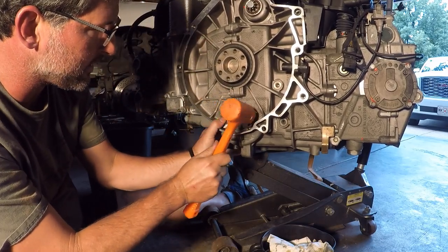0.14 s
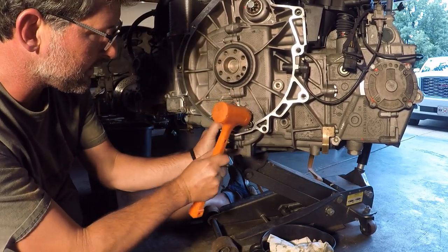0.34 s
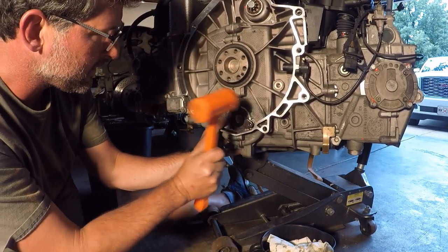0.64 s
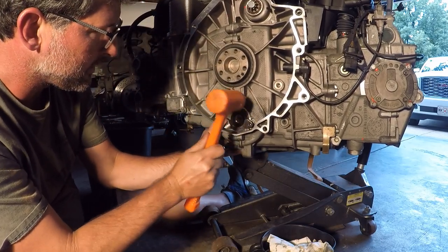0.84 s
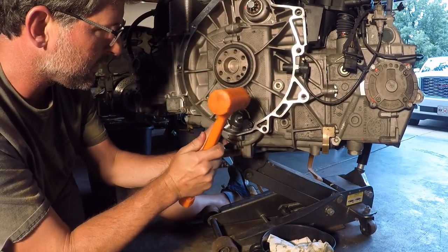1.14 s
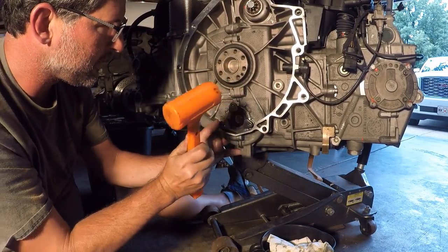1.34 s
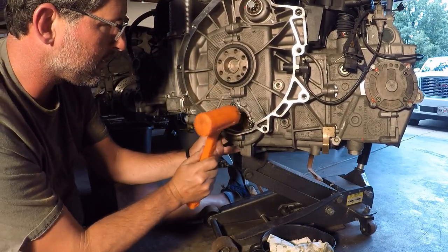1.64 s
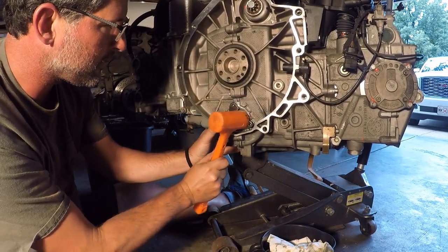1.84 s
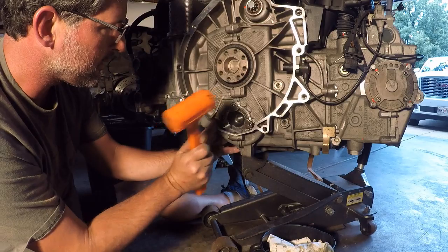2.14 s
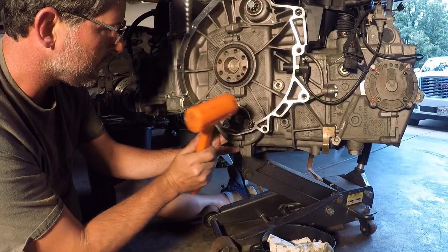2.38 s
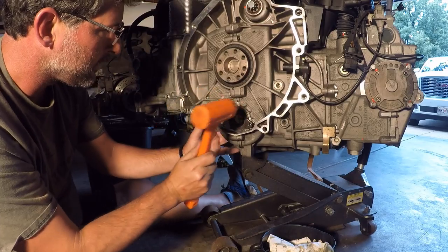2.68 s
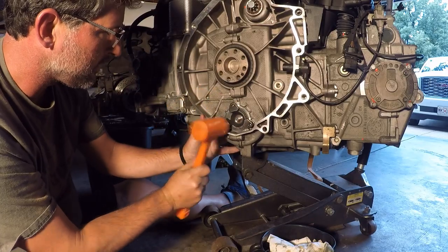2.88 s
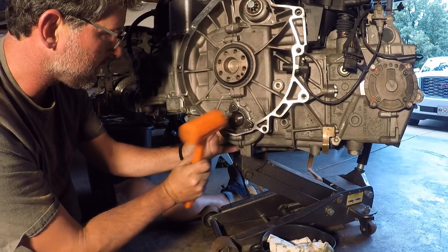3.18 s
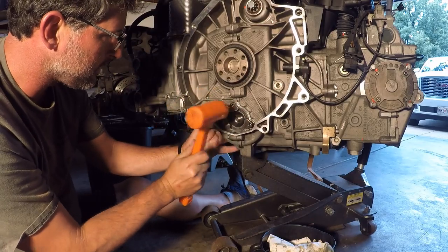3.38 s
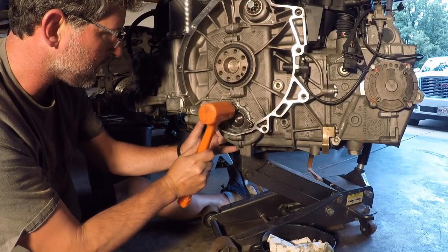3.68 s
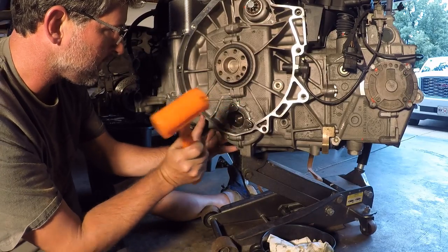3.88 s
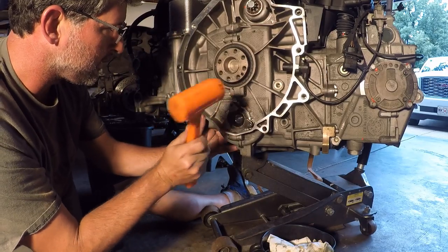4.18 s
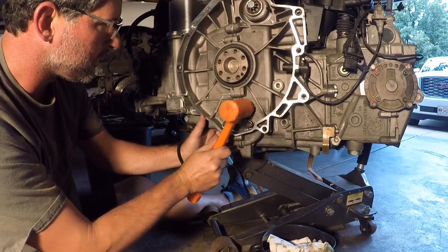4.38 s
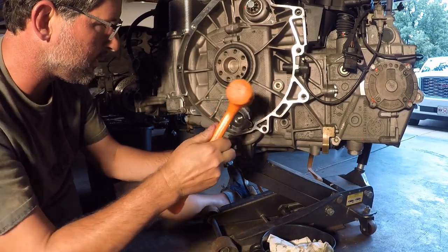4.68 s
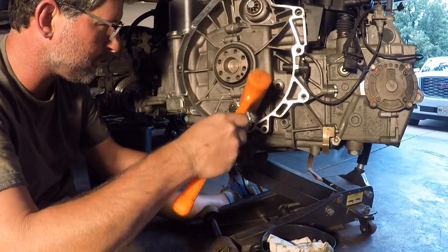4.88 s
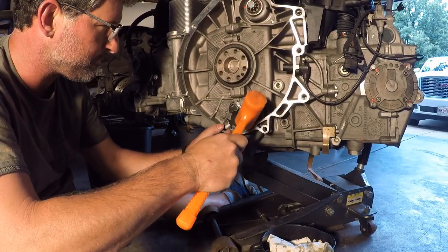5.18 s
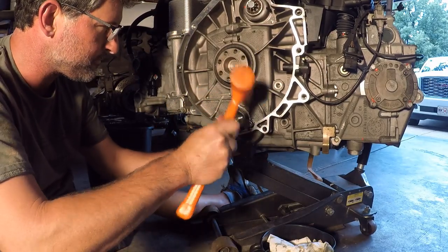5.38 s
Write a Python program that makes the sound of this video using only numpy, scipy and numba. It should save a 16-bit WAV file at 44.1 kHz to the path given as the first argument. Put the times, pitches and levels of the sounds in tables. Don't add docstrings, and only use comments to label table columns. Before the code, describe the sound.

In an open garage, a plastic mallet filled with loose shot taps a metal cover into an engine case. Fourteen short, hard clacks come roughly three a second, each with a brief metallic ring, a pellet rattle and a quick garage echo. Soft first, harder in the middle, with a pause near the end. A camera an arm's length away hears it over faint traffic and hiss.

```python
import sys
import numpy as np
from scipy import signal
from scipy.fft import rfft, irfft
from scipy.io import wavfile
from scipy.ndimage import uniform_filter1d
from numba import njit

SR = 44100
rng = np.random.default_rng(int(sys.argv[2]) if len(sys.argv) > 2 else 0)


def master_out(mix):
    frames = np.transpose(np.atleast_2d(mix))
    ceiling = np.clip(frames, -1, 1)
    pcm = np.round(ceiling * 32767).astype(np.int16)
    wavfile.write(sys.argv[1], SR, pcm)


def field_ratio(decibels):
    return 10 ** (np.asarray(decibels, dtype=float) / 20)


N = 243758

# start_s, spot, force_db, thud_db and case_db (against the cover), away_db (extra sent to the walls)
BLOWS = [(0.0315, "left", -22, -1, -0.5, -0.5), (0.3499, "upper left", -21, -1, 0.1, 0.2),
         (0.6908, "low", -28, 0.5, -7, 0.4), (1.489, "low", -25, 0, -6, -1.5),
         (1.824, "left", -17, -9.5, -4.5, 0.6), (2.2061, "upper right", -15.5, -7.5, -10, -0.3),
         (2.5306, "top", -13.5, -17, -12, 1.1), (2.904, "low", -22, -4, 1.8, 0),
         (3.2261, "right", -14.5, -17, -14.5, 0.7), (3.574, "right", -14.5, -12.5, -12, 0.2),
         (3.9524, "top", -17, -5.5, 0.5, 3.5), (4.3098, "top", -18.5, -1, -4.5, 1.3),
         (5.078, "low", -40, 8, 1.5, -2.5), (5.4255, "upper left", -21, -1, 1, -0.2)]
# pitch_hz, left_minus_right_db
SIDE_BALANCE = [(60, -6), (110, 1.5), (200, -0.5), (380, 3.5), (700, 0.5), (1290, -1), (2380, 3),
                (4400, -1), (8120, 4), (15000, -7)]
LEFT_RIGHT = np.array([[1], [-1]])


def on_log(table, hz, column=1):
    rows = np.array(table, float)
    return np.interp(np.log(np.maximum(hz, 1)), np.log(rows[:, 0]), rows[:, column])


def octaves_from(hz, centre):
    return abs(np.log2(np.maximum(hz, 1) / centre))


def bump(hz, centre, width):
    return np.exp(-(np.log(np.maximum(hz, 1) / centre) / width) ** 2)


def add(out, sound, start_s):
    i = int(start_s * SR)
    out[:, i:i + sound.shape[1]] += sound[:, :N - i]


def contact(width_ms, chatter_ms, count):
    knocks = np.zeros(300)
    chance = rng.random((count, 2))
    delay_ms = np.clip(chatter_ms, 0, 6) * chance[:, 0]
    knocks[(delay_ms * SR / 1000).astype(int)] = .8 * chance[:, 1] - .3
    knocks[0] = 1
    return -np.convolve(knocks, np.hanning(int(width_ms * SR / 1000) + 3))


def ring(modes, push, db, skew):
    spread_db, detune = 2.0, .012
    hz, gain_db, t60_s = np.array(modes, float).T[:, :, None]
    t = np.arange(2600) / SR
    lag = -1.6 * np.argsort(np.argsort(hz, axis=0), axis=0)
    chance = rng.standard_normal((len(modes), 4)).T[:, :, None]
    shape = field_ratio(-60 * t / t60_s) * (1 - 0.8 * np.exp(-t / 0.0005))
    ports = []
    for side in (1, -1):
        level = field_ratio(gain_db + spread_db * (chance[0] + skew * side * chance[1]))
        phase = 2 * np.pi * hz * (1 + detune * chance[2]) * t + lag + skew * side * chance[3]
        ports.append(np.sum(level * shape * np.sin(phase), axis=0))
    sound = signal.fftconvolve(np.array(ports), push[None])[:, :len(t)]
    return sound * field_ratio(db) / sound.mean(axis=0)[:400].std()


def blend(reach_db, notes_hz, lift_db):
    # low_hz, high_hz
    part_hz = [(150, 600), (600, 1500), (1500, 4200), (4200, 8000)]
    # pitch_hz, level_db
    far_treble = [(7400, 0.55), (8800, -21), (15000, -29.5)]
    # pitch_hz, lift_db, relative_width
    hollows = [(200, -4, 0.15), (375, 5, 0.13), (650, -4, 0.1), (800, 2, 0.06), (990, 4, 0.09),
               (2800, 2, 0.15)]
    hz = np.arange(2049) * SR / 4096
    colour = [(np.sqrt(lo * hi), db - 10 * np.log10(hi - lo)) for (lo, hi), db in zip(part_hz, reach_db)]
    colour_db = on_log(colour, hz) + on_log(far_treble, hz)
    colour_db += sum(lift_db * bump(hz, f, 0.45) for f in notes_hz)
    colour_db += sum(db * bump(hz, f, width) for f, db, width in hollows)
    fold = np.clip(2 - np.arange(4096) // 1024, 0, 2) - (np.arange(4096) == 0)
    causal = irfft(np.exp(rfft(irfft(np.log(field_ratio(colour_db))) * fold)))
    return causal[None] * np.ones((2, 1))


def blows():
    spots = {"left": (520, 764, 1690, 6300, -1.5), "upper left": (527, 770, 3450, 6200, -1.5),
             "low": (310, 960, 2350, 5900, -2), "right": (516, 1540, 2280, 6550, -1.5),
             "top": (280, 1170, 3200, 4550, -6), "upper right": (270, 1150, 1754, 4750, -6)}
    # pitch_hz, level_db, t60_s (time to fade by 60 dB)
    thud = [(213, 1, 0.056), (270, 20.5, 0.0086), (370, 1.5, 0.036), (536, -4, 0.17)]
    case = [(620, -6, 0.015), (770, 2, 0.024), (865, 3, 0.022), (1000, 3, 0.014), (1170, 1, 0.022),
            (1300, -6, 0.008)]
    cover = [(1687, 3.5, 0.008), (1970, 5.5, 0.0057), (2400, 0, 0.0074), (2780, 10, 0.0024),
             (3105, 0.5, 0.0087), (3525, 11.5, 0.0061), (4000, 7, 0.0029)]
    crack = [(4445, -4, 0.019), (5250, -42, .005), (5810, 4, 0.0066), (7000, 17, 0.0018),
             (6900, -14, 0.0076), (8800, -27, 0.0036), (9400, 9, 0.014), (11700, -22, .003),
             (13000, -23, .003), (14500, -26, .003)]
    trim_db = (0.83, 0.74, 0.73, 2.6)
    note_t60_s = (.035, .02, .008, .006)
    skew = (0.044, 0.64, 0.31, 0.59)
    reach_share = (0.12, 0.16, 0, 0)
    usual_reach_db, reach_per_db = np.array([-45.5, -42, -41, -45]), np.array([0.25, 0.95, 1.05, 0.42])
    usual_force_db, note_db = -17, 8
    crack_db, crack_per_db = -24.5, 0.52
    near, far = np.zeros((2, N)), np.zeros((2, N))
    for start_s, spot, force_db, thud_db, case_db, away_db in BLOWS:
        *notes_hz, case_pan_db = spots[spot]
        pan_db = (3.2, case_pan_db, 0.8, 2.2)
        extra_db = force_db - usual_force_db
        part_db = (force_db + thud_db, force_db + case_db, force_db, crack_db + crack_per_db * extra_db)
        hard = contact(.1, 2.2, count=4)
        pushes = (contact(0.25, 3.68, count=2), hard, hard, hard)
        for k, modes in enumerate((thud, case, cover, crack)):
            note = (notes_hz[k], note_db, note_t60_s[k])
            close = ring(modes + [note], pushes[k], part_db[k] + trim_db[k], skew[k])
            add(near, close * field_ratio(pan_db[k] * LEFT_RIGHT / 2), start_s - .0003)
        reach_db = usual_reach_db + reach_per_db * extra_db
        reach_db += np.array(reach_share) * (thud_db + 11, case_db + 3, 0, 0) + away_db
        add(far, blend(reach_db, notes_hz[:3], lift_db=-0.14) * field_ratio(88.0), start_s)
    return near, far


def shot():
    # pile_up_s, level_db, slide_ms
    slides = [(0.31, -38.5, 40), (0.648, -37.5, 38), (0.992, -43.5, 28), (1.172, -51.5, 34),
              (1.379, -47, 35), (1.773, -39.5, 40), (2.159, -37.5, 43), (2.483, -39.5, 49),
              (2.816, -44, 40), (3.18, -39, 36), (3.529, -38, 45), (3.906, -38, 58), (4.264, -36, 44),
              (4.825, -59, 59), (5.042, -41.5, 28), (5.382, -40, 21)]
    # pitch_hz, level_db (per Hz)
    shot_colour = [(1180, -14), (2000, -8), (2460, -3.5), (3520, -1), (4080, -2.5), (6090, 2),
                   (8480, -12.5), (9740, -14), (11000, -18), (13900, -14), (15600, -27), (16000, -54)]
    t, effort = np.arange(N) / SR, np.zeros(N)
    moves = []
    for pile_up_s, db, slide_ms in slides:
        fall_ms = 30.5 * field_ratio(-0.26 * (db + 39.5))
        moves.append((pile_up_s, db, slide_ms, 11.5, fall_ms))
    for start_s, _, _, thud_db, *_ in BLOWS:
        throw_db = -28 + 1.67 * min(thud_db, 0)
        moves.append((start_s + 0.0087, throw_db, 5.5, 6, 22))
    for peak_s, db, slide_ms, swell_db, fall_ms in moves:
        ms = (t - peak_s) * 1000
        shape_db = np.where(ms < 0, swell_db * ms / slide_ms, -20 * ms / fall_ms)
        effort += field_ratio(db + shape_db) * np.clip((ms + slide_ms) / 9 + .5, 0, 1)
    hz, spectrum = np.arange(N // 2 + 1) * SR / N, 0
    for centre in 1000 * 2 ** np.arange(0, 4.1, 1 / 3):
        knocks = rng.standard_normal((3, N)) * (rng.random(N) < .045)
        spectrum = spectrum + rfft(knocks) * np.clip(1 - 3 * octaves_from(hz, centre), 0, 1)
    clicks = irfft(spectrum * field_ratio(on_log(shot_colour, hz)), N)
    return effort * field_ratio(4.5) * (clicks[0] + .5 * clicks[1:]) / clicks.std()


def diffuse_bands(size):
    # pitch_hz, correlation
    likeness = [(60, 0.23), (130, 0.36), (290, 0.74), (640, -0.1), (1410, -0.28), (3100, 0.7), (6820, 0.05),
                (15000, -0.18)]
    hz = np.arange(size // 2 + 1) * SR / size
    like = np.clip(on_log(likeness, hz), -.95, .95)
    mid, side = rfft(rng.standard_normal((2, size)))
    pair = (np.sqrt(1 + like) * mid + np.sqrt(1 - like) * side * LEFT_RIGHT) / np.sqrt(2)
    for centre in 40 * 2 ** np.arange(0, 9.1, .5):
        yield centre, pair * np.clip(1 - 2 * octaves_from(hz, centre), 0, 1), hz


def garage(x, wet_db, build_ms, hold_s, early_db, early_t60):
    # pitch_hz, t60_s, level_db
    echo_colour = [(145, 0.47, 3), (406, 0.38, 4.5), (1010, 0.39, 7.5), (2900, 0.42, 0), (4760, 0.35, 1.5),
                   (7500, 0.34, 5), (8600, 0.36, 13.5), (13000, 0.34, 10.5), (16000, .2, -14)]
    t = np.arange(2 ** 15) / SR
    gather = 1 - np.exp(-(t * 1000 / build_ms) ** 2)
    fading_s = np.hypot(t, hold_s) - hold_s
    early = field_ratio(early_db - 60 * t / early_t60) * (t > .0015)
    echoes = 0
    for centre, band, hz in diffuse_bands(len(t)):
        lean_db = 0.46 * on_log(SIDE_BALANCE, centre) * LEFT_RIGHT
        late = gather * field_ratio(-60 * fading_s / on_log(echo_colour, centre))
        echoes = echoes + irfft(band) * field_ratio(on_log(echo_colour, centre, column=2) + lean_db) * (early + late)
    return field_ratio(wet_db) * signal.fftconvolve(x.mean(axis=0)[None], echoes)[:, :N]


def walk(rate):
    k = int(SR / rate)
    steps = np.repeat(rng.standard_normal(N // k + 1), k)
    return uniform_filter1d(uniform_filter1d(steps, k), k)[:N]


def outdoors():
    # pitch_hz, level_db (per Hz)
    noise_colour = [(140, 1), (250, 0.5), (345, -4.5), (420, -6.5), (620, -7.5), (1000, -9.5), (1550, -7),
                    (2400, -16.5), (4500, -21.5), (7000, -15), (8200, -22.5), (11500, -33), (14800, -39),
                    (16000, -54)]
    # pitch_hz, level_db
    hum_tones = [(356, -53), (271, -71)]
    swell, out = walk(1.0), 0
    for _, band, hz in diffuse_bands(2 * (N // 2 + 1)):
        lean_db = on_log(SIDE_BALANCE, hz) / 2 * LEFT_RIGHT
        noise = irfft(band * field_ratio(on_log(noise_colour, np.maximum(hz, 140)) + lean_db))[:, :N]
        out = out + noise * field_ratio(1.1 * swell + 0.43 * walk(3.9))
    t = np.arange(N) / SR
    hum = sum(field_ratio(db - 3.0 + 5.8 * walk(25)) * np.sin(2 * np.pi * f * t) for f, db in hum_tones)
    return out * field_ratio(-45.5) / out.mean(axis=0).std() + hum


def scene():
    near, far = blows()
    pellets = shot()
    echo = garage(far + field_ratio(-8) * pellets, wet_db=-37.5, build_ms=20.4, hold_s=0.041,
                  early_db=11.5, early_t60=0.062)
    return near + pellets + echo + outdoors()


@njit
def follow(x, attack, release):
    e, out = 0., np.empty(len(x))
    for i in range(len(x)):
        e += (x[i] - e) * (attack if x[i] > e else release)
        out[i] = e
    return out


def low_pass(x):
    return signal.sosfilt(signal.butter(12, 16640, fs=SR, output="sos"), x)


def record(dry):
    low_cut = signal.ellip(N=7, rp=.5, rs=50, Wn=145, btype="high", fs=SR, output="sos")
    x = signal.sosfilt(low_cut, dry) + field_ratio(-27.5) * dry
    loud = follow(np.abs(x).max(axis=0), 1 / (0.0031 * SR), 1 / (.12 * SR))
    x = x * (1 + loud / field_ratio(-30.0)) ** -.12
    high_cut = signal.butter(N=10, Wn=15600, fs=SR, output="sos")
    x = signal.sosfilt(high_cut, .93 * np.tanh(x / .93))
    return low_pass(x)


dry = scene()
out = record(dry)
master_out(out)
```